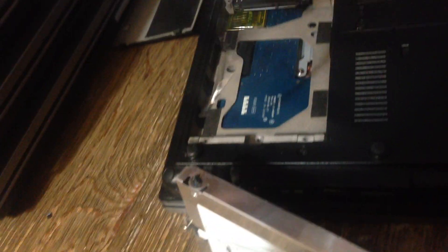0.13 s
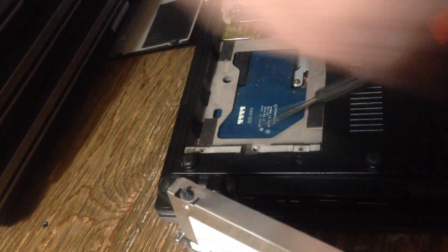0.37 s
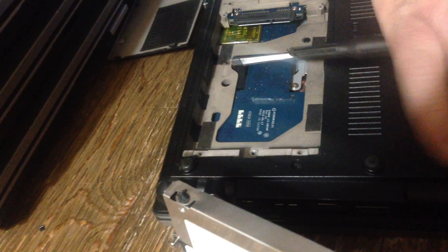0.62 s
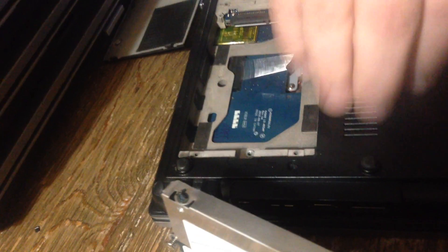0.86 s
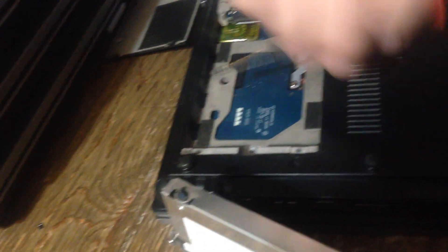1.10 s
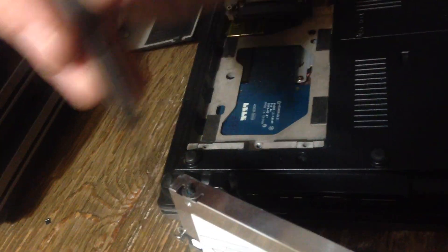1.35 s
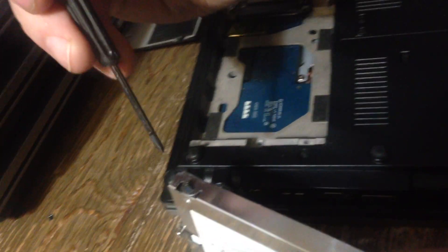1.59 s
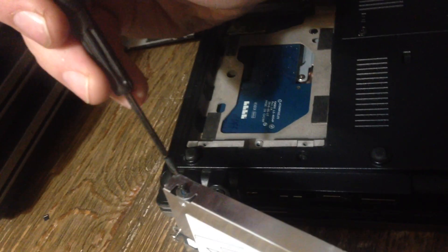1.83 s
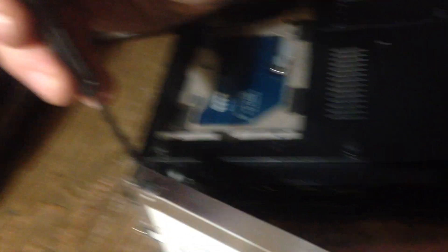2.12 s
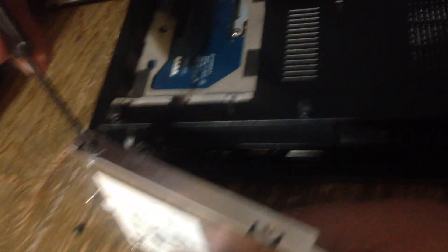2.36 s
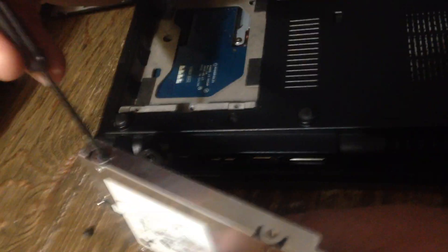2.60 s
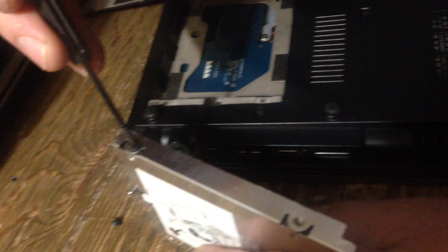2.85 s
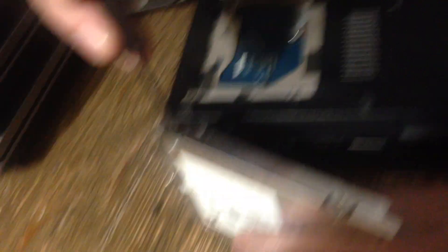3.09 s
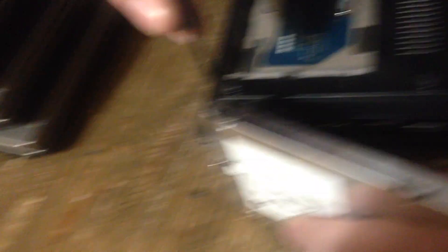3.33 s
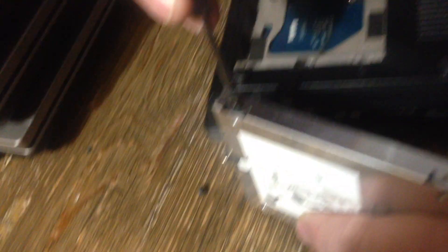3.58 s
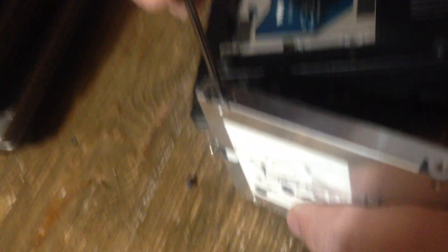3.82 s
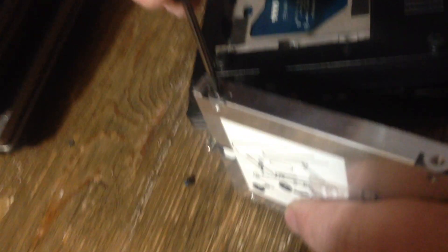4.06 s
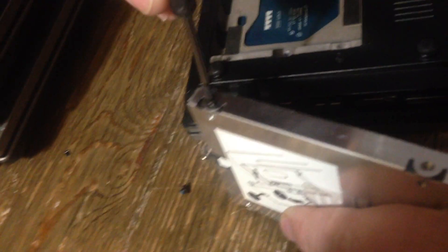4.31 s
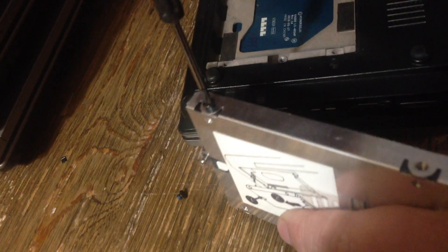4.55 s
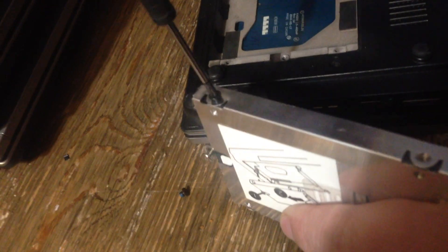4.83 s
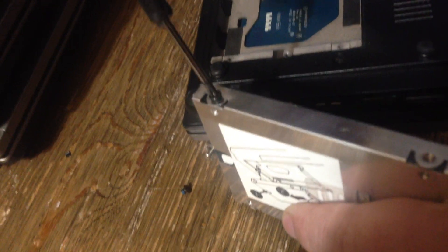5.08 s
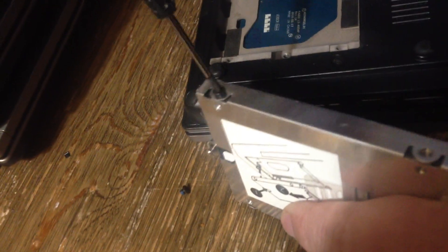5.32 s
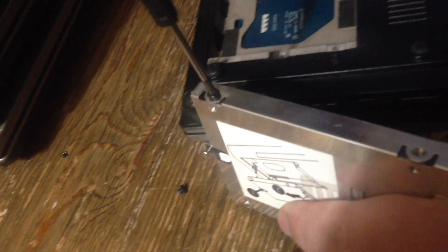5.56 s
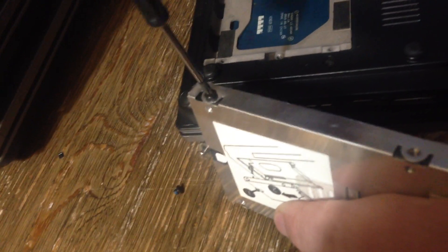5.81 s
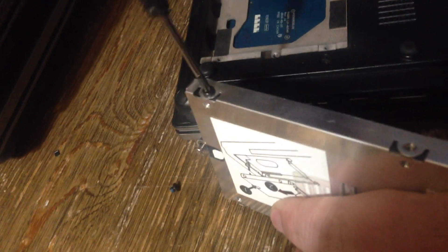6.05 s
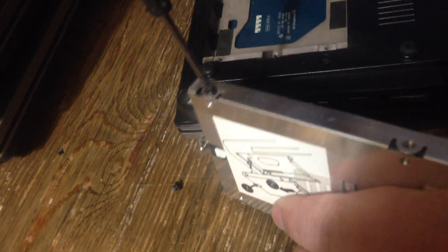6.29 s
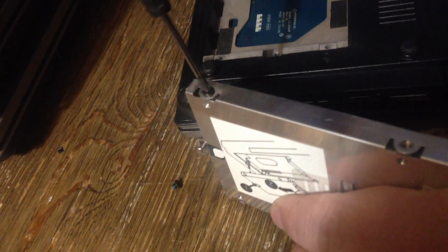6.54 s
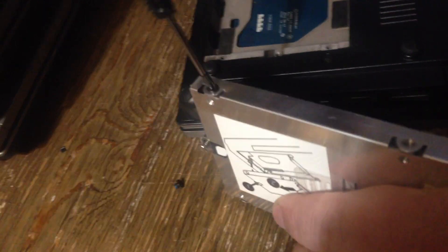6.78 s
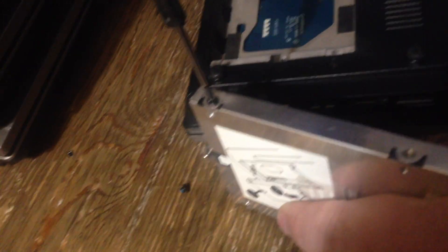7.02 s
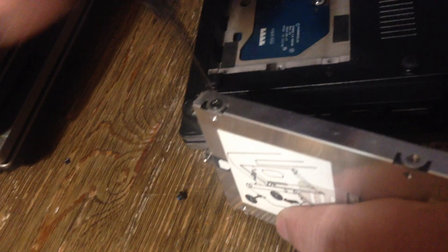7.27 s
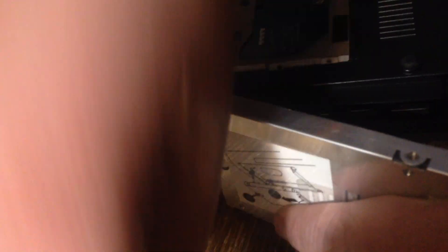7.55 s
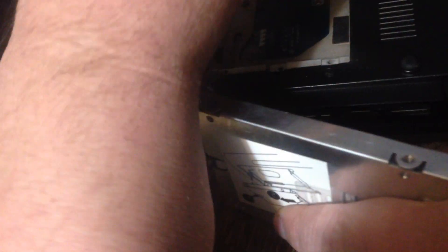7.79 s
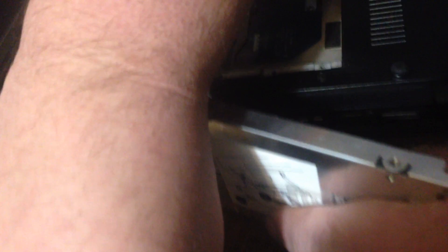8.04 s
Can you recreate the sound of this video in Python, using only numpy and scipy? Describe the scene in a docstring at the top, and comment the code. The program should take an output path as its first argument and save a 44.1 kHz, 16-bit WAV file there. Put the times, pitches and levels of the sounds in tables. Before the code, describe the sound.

A low, slightly wavering hum and dull room air run throughout, heard close to a desk in a small, fairly dry room. Faint ticks and a rub come at 0.2 s; at 0.33 s a small tool hits the laptop shell with a loud sharp crack, bouncing and rattling in hard clicks until about 0.65 s, with a low push of air. Soft bumps follow at 0.8 s, then a tight cluster of bright clicks and a scrape around 0.95-1.02 s with another push. Things go quiet: faint rubbing and tiny ticks, small bumps at 2.9 s, a clearer dull knock at 3.56 s. From 4.6 to 7 s short, soft rasps repeat about every third of a second as the screw turns, with a distinct click at 5.38 s. A click sounds at 7.28 s, then light rubs and muffled bumps near 7.6, 7.8 and 8 s.

```python
"""At a desk indoors, a small screwdriver is dropped on an open laptop shell, then turned on a metal drive caddy.
Hard contacts click and dull ones bump: short noise bursts ring the modes of desk, shell and caddy together.
Finger skin and tool tip rub softly at each turn in dense grains; loose parts rattle and skid in uneven knocks.
A hand passing the microphone gives low pushes; noise bands and a sine make the hum, broad noise the air.
The room answers with dying noise; the recorder ducks its gain after loud blows, rounds peaks and cuts the top."""
import sys
import numpy as np
from scipy import signal
from scipy.fft import rfft, irfft, next_fast_len
from scipy.io import wavfile
from scipy.ndimage import uniform_filter1d

SR = 44100
rng = np.random.default_rng(int(sys.argv[2]) if len(sys.argv) > 2 else 0)


def to_wav(sig):
    """Store sig (one row per channel, or 1-D mono) as 16-bit WAV at the path in sys.argv[1].

    Samples outside -1..1 are clipped; the rate is SR.
    """
    pcm = np.clip(np.atleast_2d(sig), -1, 1) * 32767
    pcm = np.round(pcm).astype(np.int16)
    wavfile.write(sys.argv[1], SR, pcm.T)  # frames by channels


def voltage_ratio(level):
    """Linear amplitude factor for a level in decibels (scalar or array-like)."""
    return 10 ** (np.asarray(level, float) / 20)


N = 359415

# steel clicks on shell or caddy: start_s, strength_db (drive at 4.5 kHz),
# shell_db (drive at 2 kHz over the strength), edge_db (drive at 10 kHz over the strength)
STEEL_CLICKS = [(0.177, -27.5, -1, -15), (0.3105, -35, 4, 8), (0.3224, -44, -13, 6),
                (0.334, 14, -20.5, 0.5), (0.3433, -4, 14.5, 12.5), (0.364, 1, -20, 5),
                (0.4086, -13.5, 6, 6), (0.4323, -11.5, 6, -9), (0.4468, -26.5, 8, -4), (0.4832, -49, 28, 9),
                (0.4971, -39.5, 30.5, 0), (0.5024, -23.5, 10, 4), (0.521, 4, 7, -0.5), (0.5235, 1, 4, 5),
                (0.5269, -2, -7.5, -6.5), (0.555, -9.5, -4, -20), (0.582, -23, 10, -14),
                (0.5916, -42, 30, 15), (0.626, -2, 11, 3.5), (0.6454, -2.5, 10.5, 3.5), (0.6554, -15, 5, 2),
                (0.9443, -23.5, 6.5, -4), (0.9644, -28, 21, -3), (0.9775, -21, 6, 4),
                (0.982, -15.5, 11.5, -13), (0.9877, -23, 8, 9), (0.9954, -21, 16, -2),
                (1.0204, -23.5, 11, -7), (1.3197, -49.5, 18.5, 9), (1.736, -40, 13, 2.5),
                (1.7625, -48.5, 7, 4.5), (2.2977, -33, -11, 6), (2.4259, -40.5, -2.5, 5),
                (2.6012, -46, 24, 8.5), (2.6871, -45.5, 3, 8), (2.7044, -46, 10.5, 15.5),
                (2.7294, -54.5, 17.5, 3.5), (3.1522, -41.5, 2, 8.5), (3.2294, -44, 2, 6.5),
                (3.3099, -57.5, 3.5, 16.5), (3.3239, -58, 6, 12), (3.8791, -27.5, -8.5, -5),
                (3.984, -40, 16, 14.5), (4.563, -50, 15.5, 4.5), (5.2485, -39, 4.5, -4),
                (5.2794, -44.5, 11, 4), (5.3162, -36, 17, 2), (5.3783, -15, -5, -35), (5.5944, -53, 7, 9.5),
                (5.9233, -50, 0.5, 8.5), (6.2263, -59, 2.5, 15.5), (6.5694, -52, -5, 6.5),
                (6.879, -57.5, 5.5, 12.5), (6.7791, -43, 7, -8), (7.269, -49.5, 19, 7.5),
                (7.2753, -17, -7.5, -3.5), (7.5541, -29.5, 0, -20)]


def rms_one(x):
    """Scale to rms 1."""
    return x / np.sqrt(np.mean(x ** 2) + 1e-20)


def at_hz(points, hz):
    """Read a (Hz, value) table on a log frequency axis."""
    points = np.array(points)
    return np.interp(np.log(hz), np.log(points[:, 0]), points[:, 1])


def coloured(x, spectrum):
    """Give a white signal a spectrum in dB per Hz, then scale it to rms 1."""
    size = next_fast_len(N)
    hz = np.maximum(np.arange(size // 2 + 1) * SR / size, 1)
    shaped = rfft(x, size) * voltage_ratio(at_hz(spectrum, hz))
    return rms_one(irfft(shaped, size)[:N])


def resonance(x, hz, width_hz):
    """Two-pole resonance, gain about 1 on top."""
    r = np.exp(-np.pi * max(width_hz, 1) / SR)
    feedback = [1, -2 * r * np.cos(2 * np.pi * hz / SR), r * r]
    return signal.lfilter([(1 - r * r) / 2, 0, (r * r - 1) / 2], feedback, x + 1e-18)


def drift(rate_hz):
    """Slow chance of rms 1: low-passed noise at 40 steps a second."""
    steps = rng.standard_normal(int(N / SR * 40) + 2)
    r = np.exp(-2 * np.pi * rate_hz / 40)
    slow = signal.lfilter([1], [1, -r], steps)
    return rms_one(np.interp(np.arange(N) * 40 / SR, np.arange(len(steps)), slow))


def hum_and_air():
    """Broad noise for the air; for the hum, a wavering sine and noise through narrow resonances."""
    # colour of the room air: pitch_hz, level_db (per Hz, relative)
    air_colour = [(15, -56), (25, -28.5), (61, 0.5), (120, -2), (211, -7.5), (276, -11), (403, -13),
                  (542, -15.5), (691, -23), (905, -19.5), (1510, -30), (1680, -29), (10800, -43),
                  (14600, -45.5), (15800, -44)]
    # hum bands: pitch_hz, width_hz (of each of two passes), level_db (rms)
    hum_bands = [(78, 20, -58), (145, 18, -63), (192, 27, -63.5), (254.7, 18, -62), (281.3, 29, -62),
                 (351.6, 20, -71), (551, 30, -73.5), (1000, 500, -70), (2130, 330, -78.5)]
    out = voltage_ratio(-54 + 1.3 * drift(2.5)) * coloured(rng.standard_normal(N), air_colour)
    mains_buzz = np.sin(2 * np.pi * 119.8 * np.arange(N) / SR)
    out += voltage_ratio(-54.0 + 0.89 * drift(2.7)) * mains_buzz
    for hz, width_hz, level_db in hum_bands:
        once = resonance(rng.standard_normal(N + SR), hz, width_hz)
        band = resonance(once, hz, width_hz)[SR:]   # the first second only settles the filters
        out += voltage_ratio(level_db) * rms_one(band)
    return out


def room(x, gap_ms=2.3):
    """Desk top and walls store the energy of each half-octave band and give it back as dying noise."""
    # decay of the room: pitch_hz, t60_s, level_db (over the stored level)
    decay = np.array([(250, 0.067, -8), (700, 0.13, -6), (1500, 0.094, -6), (3000, .13, -15),
                      (6000, 0.13, -16.5), (12000, 0.13, -15)])
    out, lag = 0, round(gap_ms * SR / 1000)
    white = rng.standard_normal((2, N))   # neighbouring bands take turns
    for k, hz in enumerate(200 * 2 ** np.arange(0, 6.3, .5)):
        sos = signal.butter(2, [hz / 2 ** .25, hz * 2 ** .25], "band", fs=SR, output="sos")
        keep = voltage_ratio(-120 / (at_hz(decay[:, :2], hz) * SR))   # energy left after one sample
        energy = signal.sosfilt(sos, x + 1e-18) ** 2
        stored = signal.lfilter([1 - keep], [1, -keep], energy)
        stored = np.append(np.zeros(lag), uniform_filter1d(stored, size=64)[:N - lag])
        noise = rms_one(signal.sosfilt(sos, white[k % 2]))
        out = out + voltage_ratio(at_hz(decay[:, ::2], hz)) * np.sqrt(np.abs(stored)) * noise
    return out


def pushes():
    """A hand passing the microphone: about one cycle of low pressure each, a sine under a bell."""
    # low pushes: middle_s, sine_db (peak of the sine before the bell), pitch_hz
    hand_passes = [(0.333, -32.5, 64.6), (0.966, -29.5, 75), (7.274, -41, 70.3)]
    now, out = np.arange(N) / SR, 0
    for s, sine_db, hz in hand_passes:
        bell = np.exp(-(2.2 * hz * (now - s)) ** 2)
        out = out + voltage_ratio(sine_db) * np.sin(2 * np.pi * hz * (now - s)) * bell
    return out


def strokes():
    """Turns, the regrip after each, and rubs as (middle s, ms, slide dB, rasp dB, skin dB)."""
    # turns of the screw: middle_s, length_ms (at half power), rasp_db (tool tip),
    # regrip_skin_db (skin hiss of the regrip that follows)
    screw_turns = [(4.599, 44, -63, -69), (4.992, 75, -63, -77), (5.333, 67, -59.5, -73),
                   (5.675, 51, -62, -66), (5.985, 53, -60, -70), (6.303, 61, -60, -67),
                   (6.648, 28, -58, -68.5), (7.011, 36, -76, -83.5)]
    # other handling: middle_s, length_ms (at half power), rasp_db, dullness_db (slide over the rasp)
    handling = [(.12, 75, -70.5, 1), (.184, 20, -59.5, -10), (.385, 40, -33.5, -8), (.5, 15, -65, 8),
                (.56, 140, -52, 2), (.748, 39, -55.5, 1.5), (.825, 34, -64.5, 2), (0.953, 7.6, -43, -7),
                (0.989, 16.8, -30, -5.5), (1.01, 22, -41.5, -10), (1.072, 40, -60, 2.5),
                (1.312, 114, -68, -6), (1.391, 58, -71, -6.5), (1.518, 60, -67.5, 7.5),
                (1.77, 25, -63, -1.5), (1.9, 220, -74.5, 0.5), (2.258, 27, -68.5, 2.5),
                (2.357, 87, -69, -0.5), (2.509, 62, -71, -3.5), (2.62, 45, -67, 4), (2.75, 31, -71.5, -2),
                (2.94, 40, -73, 18.5), (3.05, 106, -69, 4), (3.45, 310, -76.5, 6), (3.761, 29, -73, 3.5),
                (4.009, 29, -72.5, 1.5), (4.499, 85, -74, 1), (4.9, 39, -68, -10), (5.74, 58, -70.5, -2),
                (6.391, 25.4, -69.5, -7), (7.38, 45, -64, -14.5), (7.535, 63, -62, -12),
                (7.771, 99, -71.5, 2), (7.89, 66, -75, 8.5), (7.999, 96, -73, 3.5)]
    turns = [(s, ms, rasp_db - 7.5, rasp_db, rasp_db - 7.5) for s, ms, rasp_db, _ in screw_turns]
    # fingers shift on the handle; slide and rasp count from the skin hiss
    regrip_after_s, regrip_ms = 0.16, 34
    regrips = [(s + regrip_after_s, regrip_ms, skin_db - 3, skin_db - 4, skin_db)
               for s, *_, skin_db in screw_turns]
    # a duller rub has less skin hiss
    rubs = [(s, ms, rasp_db + dull_db, rasp_db, rasp_db - 5 - .35 * dull_db)
            for s, ms, rasp_db, dull_db in handling]
    return turns + regrips + rubs


def rubbing(grain_db=4.0, per_s=2100.0, smooth=1.8, flutter_db=1.5):
    """Dense stick-slip grains over smooth noise swell and fade with each stroke."""
    # colour of the low slide: pitch_hz, level_db (per Hz, relative)
    slide_colour = [(240, -35), (400, -19), (847, -4), (1310, -4.5), (2150, -5), (2800, -14.5), (3760, -43),
                    (5000, -29), (6500, -67), (11000, -120)]
    # colour of the tool tip rasp: pitch_hz, level_db (per Hz, relative)
    rasp_colour = [(1500, -41.5), (2300, -6), (3000, -6), (3700, -1), (5000, -6), (6500, -5.5), (8500, -14),
                   (13000, -28.5)]
    # colour of the skin hiss: pitch_hz, level_db (per Hz, relative)
    skin_colour = [(4000, -33.5), (6500, -15.5), (8500, -6), (11000, -5), (14000, -2), (15500, -8)]
    now, power = np.arange(0, N, 32) / SR, 0
    for s, ms, *level_db in strokes():
        swell = np.exp(-(1665 * (now - s) / ms) ** 2)   # half power at ms / 2 either side
        power = power + voltage_ratio(np.array(level_db))[:, None] ** 2 * swell
    out = 0
    for level, spectrum in zip(np.sqrt(power), (slide_colour, rasp_colour, skin_colour)):
        sizes = voltage_ratio(grain_db * np.minimum(rng.exponential(1, N), 5))
        grains = sizes * (rng.random(N) < per_s / SR) * rng.choice([-1, 1], N)
        sound = coloured(grains + smooth * rng.standard_normal(N), spectrum)
        out = out + np.interp(np.arange(N) / SR, now, level) * voltage_ratio(flutter_db * drift(18)) * sound
    return out


def blows():
    """Clicks and bumps as (start s, chatter ms, drive spectrum [(Hz, dB)])."""
    # dull bumps on the desk: start_s, thud_db (drive at 700 Hz), shell_db (drive at 2 kHz over the thud)
    desk_bumps = [(0.7965, -24.5, 7.5), (0.8102, -36.5, 14.5), (0.8169, -29.5, 13.5), (0.824, -41.5, 6),
                  (0.841, -34.5, 7), (2.9147, -30.5, -5), (2.9247, -33.5, -6.5), (2.9348, -30, 3.5),
                  (3.5576, -15, 12), (3.5623, -12.5, -2.5), (4.787, -30.5, -22), (7.1288, -38.5, -9.5),
                  (7.5702, -34, -6.5), (7.793, -19.5, -5), (8.0273, -29.5, -11)]
    hz = (700, 2000, 4500, 10000)
    click_ms, bump_ms = .9, .8
    thud_db = -22   # the desk hears a click this far under the shell
    steel_db, edge_db = -20.5, -32   # of a bump: 4.5 kHz under the shell, 10 kHz under the thud
    hits = []
    for s, db, shell, edge in STEEL_CLICKS:
        drive_db = (db + shell + thud_db, db + shell, db, db + edge)
        hits.append((s, click_ms, list(zip(hz, drive_db))))
    for s, db, shell in desk_bumps:
        drive_db = (db, db + shell, db + shell + steel_db, db + edge_db)
        hits.append((s, bump_ms, list(zip(hz, drive_db))))
    return hits


def jolts():
    """The rattles after each blow, and the skids, as (start s, t60 ms, dB, Hz, width Hz)."""
    # loose parts rattling after every blow: pitch_hz, width_hz, t60_ms, after_click_db, after_bump_db
    # (both over the drive of the blow at that pitch)
    loose_parts = [(268, 110, 190, -33, -25.5), (820, 550, 140, -34, -27.5),
                   (1650, 1800, 120, -39.5, -27.5), (3300, 1900, 110, -45, -32.5),
                   (5655, 8900, 140, -38.5, -42)]
    # a part skids to rest: start_s, t60_ms, level_db (rms before the decay), pitch_hz
    skids_to_rest = [(0.313, 480, -49, 2900), (.432, 98, -32, 2420), (0.434, 180, -37.5, 1787),
                     (0.486, 83, -34, 2400), (0.486, 160, -45, 1800), (.984, 64, -26.5, 3850),
                     (2.914, 240, -41, 1240), (2.917, 240, -50.5, 2050), (3.457, 60, -58.5, 3000),
                     (3.575, 260, -48.5, 1854), (5.315, 110, -49.5, 3700), (4.891, 650, -67, 3760),
                     (5.3788, 19.7, -24.5, 3080), (5.382, 150, -58, 3100), (7.855, 120, -41.5, 350)]
    found = []
    for k, (s, chatter_ms, drive) in enumerate(blows()):
        for hz, width_hz, ms, click_db, bump_db in loose_parts:
            after_db = click_db if k < len(STEEL_CLICKS) else bump_db   # clicks come first in the list
            found.append((s + chatter_ms / 1000, ms, at_hz(drive, hz) + after_db, hz, width_hz))
    return found + [(s, ms, db, hz, 0.32 * hz) for s, ms, db, hz in skids_to_rest]


def skids(grain_db=5.0, per_s=4500.0, smooth=0.7, hurry=1.15):
    """Rattles and skids: uneven little knocks start at once and die, in one broad, steep-sided resonance."""
    t, out = np.arange(SR // 4) / SR, np.zeros(N + SR // 4)
    for s, ms, level_db, hz, width_hz in jolts():
        sizes = voltage_ratio(grain_db * np.minimum(rng.exponential(1, len(t)), 4))
        knocks = sizes * (rng.random(len(t)) < per_s / SR)
        sound = (knocks + smooth) * rng.standard_normal(len(t))
        for pass_width_hz in (width_hz, width_hz, 0.87 * width_hz):   # three passes steepen the sides
            sound = resonance(sound, hz, pass_width_hz)
        decay_db = 60 * (1000 * t / ms) ** hurry
        out[round(s * SR):][:len(t)] += voltage_ratio(level_db - decay_db) * rms_one(sound)
    return out[:N]


def contacts(scatter_db=1.0, crack_db=-20.0, level_db=-6):
    """A contact is a few ms of chatter; it strikes each mode by how dull or hard the blow is."""
    # what a contact rings with, desk, shell and caddy together: pitch_hz, width_hz, level_db (relative)
    modes = [(157, 69, -10), (272, 170, -10), (437, 82, -8), (517, 54, -5.5), (747, 92, -6), (880, 160, -7),
             (1330, 200, -3), (1600, 350, 2), (1790, 690, 4), (2400, 270, -5), (2680, 390, -1.5),
             (3264, 250, -8), (3700, 400, 3), (4300, 410, -6), (4900, 620, 2.5), (6200, 440, -8.5),
             (6790, 720, 0.5), (8640, 1200, -10.5), (8800, 830, -13), (10650, 2700, -5.5),
             (11554, 7500, -14), (13100, 8100, -5), (13500, 900, -12.5)]
    t = np.arange(2048) / SR
    hits = blows()
    luck = rng.standard_normal((len(hits), 32))
    chatter = rng.standard_normal((len(hits), len(t)))
    drive = np.zeros((len(modes) + 1, N + len(t)))   # one row a mode, the last for the bare crack
    hz, width_hz, mode_db = np.transpose(modes)
    # how much of the burst's spectrum each mode takes up
    reach = 1 / (1 + (2 * (np.fft.rfftfreq(len(t), 1 / SR) - hz[:, None]) / width_hz[:, None]) ** 2)
    reach /= reach.sum(axis=1, keepdims=True)
    for k, (s, ms, colour) in enumerate(hits):
        ms = np.clip(ms, .2, 9)
        burst = chatter[k] * np.exp(-(500 * t / ms) ** 2) / np.sqrt(ms)   # down to 1/e at twice ms
        strike_db = level_db + at_hz(colour, hz) + mode_db + scatter_db * luck[k, :len(hz)]
        strength = voltage_ratio(strike_db) * SR / width_hz / 60
        crack = voltage_ratio(colour[-1][1] + crack_db)   # counts from the drive at 10 kHz
        # every mode gets its share, whatever the chance spectrum of the burst
        strength /= np.sqrt(reach @ np.abs(rfft(burst)) ** 2 / np.sum(burst ** 2))
        i = round(s * SR)
        drive[:, i:i + len(t)] += np.append(strength, crack)[:, None] * burst
    out = np.diff(drive[-1])[:N]   # the difference brightens the crack
    for m in range(len(hz)):
        # a low mode is only driven by the soft part of the blow
        low_pass = signal.butter(4, min(1.5 * hz[m], .45 * SR), fs=SR, output="sos")
        soft = signal.sosfilt(low_pass, drive[m, :N] + 1e-18)
        out += (-1) ** m * resonance(soft, hz[m], width_hz[m])
    return out


def scene():
    """Contacts, rubbing and skids with the room's answer, over pushes, hum and air."""
    close = contacts() + rubbing() + skids()
    return (close + room(close) + pushes() + hum_and_air())[None]


def band_limit(x):
    """A steep low-pass at the top of the band."""
    return signal.sosfilt(signal.butter(12, 16540, fs=SR, output="sos"), x)


def record(dry):
    """Gain control ducks above a threshold and recovers steadily; peaks are rounded and the top is cut."""
    threshold_db, share, release_db_s = -30, .3, 40   # share: dB of ducking per dB above the threshold
    ceiling = .75
    level_db = 10 * np.log10(uniform_filter1d(dry[0] ** 2, size=256) + 1e-12)
    climb_db = release_db_s * np.arange(N) / SR
    wanted_db = share * np.maximum(level_db - threshold_db, 0)
    duck_db = np.maximum.accumulate(wanted_db + climb_db) - climb_db
    duck_db = signal.lfilter([.008], [1, -.992], duck_db)   # eases in over some 3 ms
    rounded = ceiling * np.tanh(dry * voltage_ratio(-duck_db) / ceiling)
    cut = signal.sosfilt(signal.cheby2(10, 50, 15900, fs=SR, output="sos"), rounded)
    return band_limit(cut)


dry = scene()
out = record(dry)
to_wav(out)
```